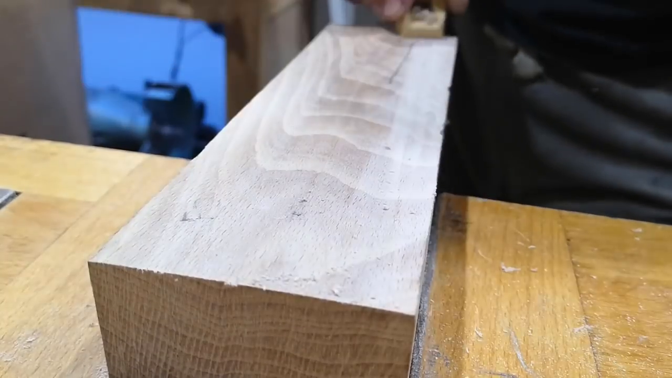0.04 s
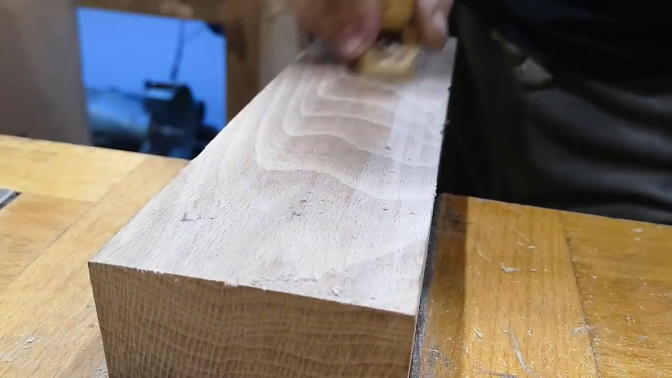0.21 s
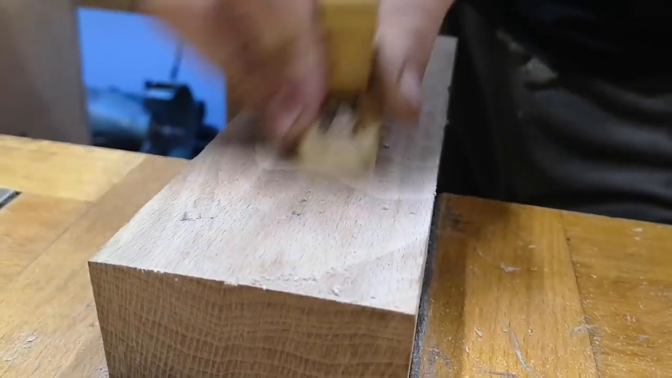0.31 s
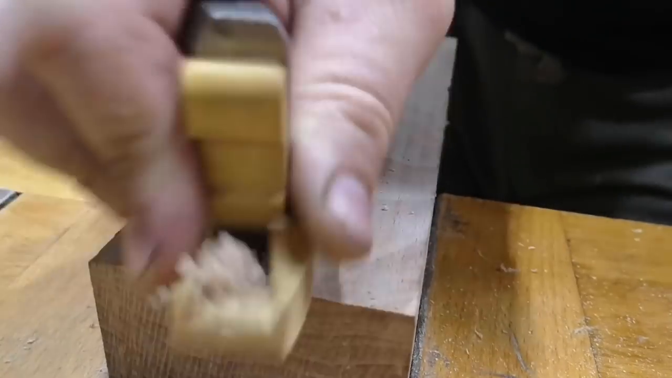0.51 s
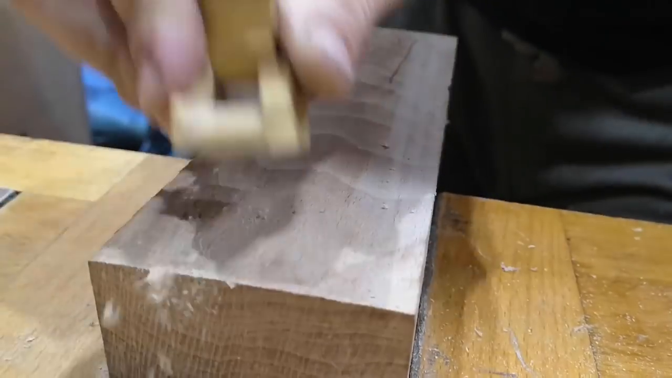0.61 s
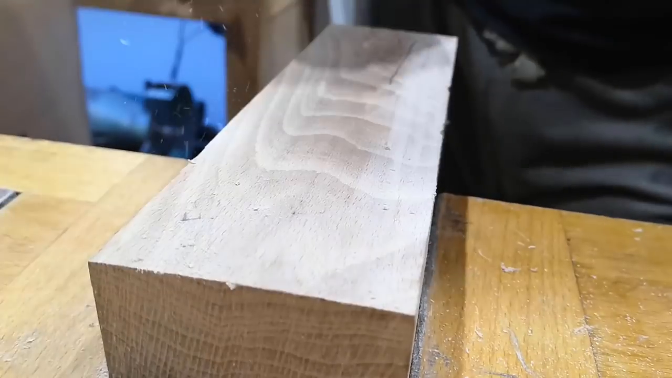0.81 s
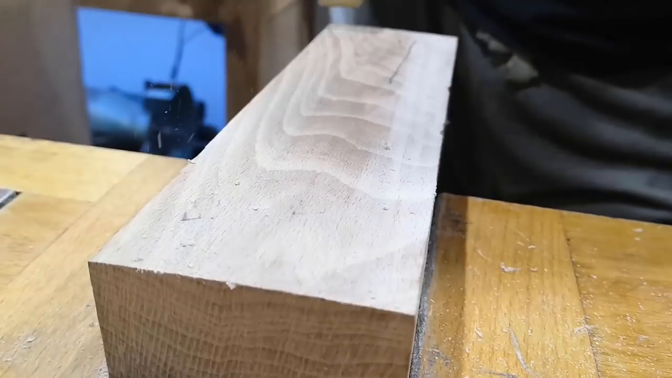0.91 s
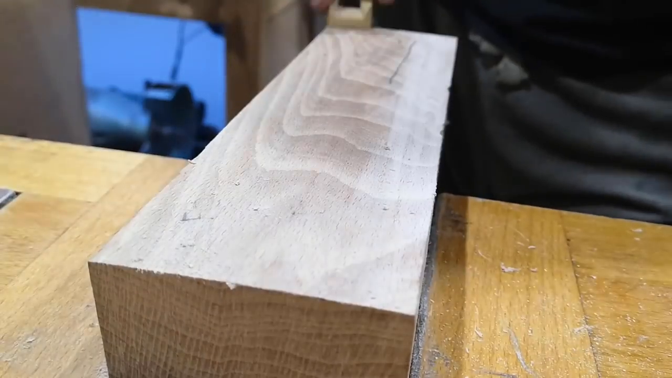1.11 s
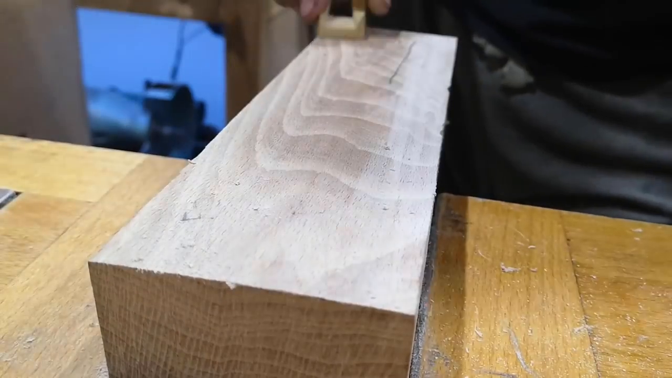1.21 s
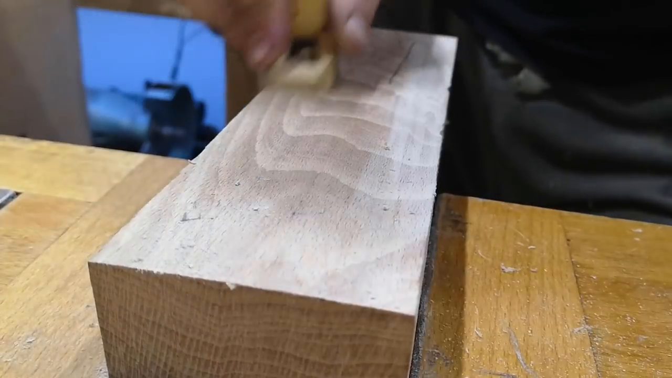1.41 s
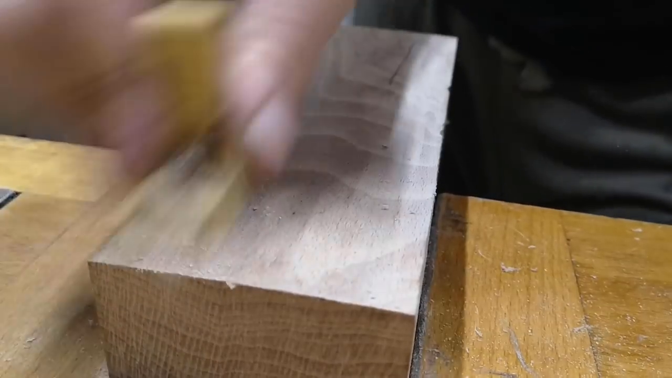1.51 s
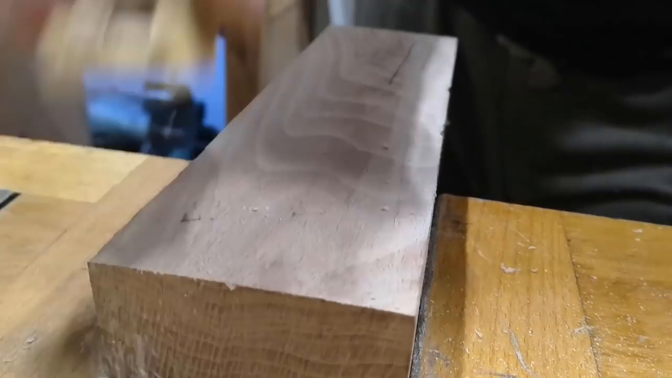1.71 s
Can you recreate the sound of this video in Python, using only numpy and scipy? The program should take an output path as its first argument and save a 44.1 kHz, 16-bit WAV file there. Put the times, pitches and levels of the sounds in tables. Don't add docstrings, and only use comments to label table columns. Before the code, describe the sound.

Hand plane strokes on hardwood: a squealing, chattering scrape, a few wooden knocks, then one crisp rising rasp

```python
import sys
import numpy as np
from scipy import signal
from scipy.fft import rfft, irfft, next_fast_len
from scipy.io import wavfile
from scipy.ndimage import uniform_filter1d

SR = 44100
rng = np.random.default_rng(int(sys.argv[2]) if len(sys.argv) > 2 else 0)


def makeup_ratio(level_db):
    decades = np.asarray(level_db, float) / 20
    return 10 ** decades


def int16_out(signal):
    q = np.round(np.clip(np.atleast_2d(signal).T, -1, 1) * 32767)
    wavfile.write(sys.argv[1], SR, q.astype(np.int16))


N = 79380
T = np.arange(N) / SR
SIZE = next_fast_len(N + SR // 2)
HZ = np.arange(SIZE // 2 + 1) * SR / SIZE + 1e-3


def unit(x):
    return x / np.sqrt(np.mean(x ** 2))


def along(table):
    hz, value = np.array(table, float).T
    return np.interp(np.log(HZ), np.log(hz), value)


def ring(x, peaks, order=1):
    response = 0
    for k, (hz, width_hz, level_db) in enumerate(peaks):
        detune = (HZ / hz - hz / HZ) * hz / width_hz
        response = response + (-1) ** k * makeup_ratio(level_db) / (1 + 1j * detune) ** order
    return irfft(rfft(x, SIZE) * response, SIZE)[:N]


def walk(rate_per_s):
    hold = int(SR / rate_per_s)
    steps = np.repeat(rng.standard_normal(N // hold + 1), hold)
    return unit(uniform_filter1d(uniform_filter1d(steps, hold), hold)[:N])


def fibres():
    snaps_per_s, spread_db = 16000, 1.8
    grain_db, grain_per_s = 1.2, 300
    hit = rng.random(N) < snaps_per_s / SR
    snaps = hit * makeup_ratio(spread_db * rng.exponential(size=N)) * rng.standard_normal(N)
    return snaps * makeup_ratio(grain_db * walk(grain_per_s))


# start_s, cut_db, rub_db
STROKES = [
    [(0, -34, -33), (.012, -34.5, -37.5), (.035, -43.5, -38.5), (.064, -54, -48), (.118, -94, -93.5),
     (.16, -66.5, -54.5)],
    [(.165, -59, -55.5), (.181, -30, -40.5), (.237, -24, -35), (.335, -23.5, -37.5), (.375, -19, -34),
     (.382, -28, -37.5), (.393, -33, -43), (.485, -58.5, -53), (.497, -85.5, -85)],
    [(.5015, -69, -43), (.516, -72, -51.5), (.56, -49, -62.5), (.59, -76, -47), (.64, -94, -64.5),
     (.7, -87, -70.5)],
    [(1.17, -51, -42), (1.212, -66.5, -52.5), (1.248, -64, -65.5), (1.255, -44, -48.5), (1.275, -36, -42),
     (1.336, -33.5, -41), (1.4, -27.5, -38.5)],
    [(1.4, -26, -38), (1.518, -17.5, -38.5), (1.537, -21.5, -41), (1.542, -32, -46.5), (1.59, -47.5, -51),
     (1.625, -45, -62), (1.645, -78, -76.5), (1.72, -99, -97)],
]
# pitch_hz, width_hz, level_db, edge_db (blade edge ring)
SPOTS = [(1050, 170, 12, -4.5), (1586, 80, 9, -3), (1253, 296, -10, -17), (1400, 65, -12, -1.5),
         (1400, 92, -8, 5)]
# pitch_hz, width_hz, level_db
BLADE = [(3678, 830, -18.5), (5557, 1710, -10.5), (6830, 1200, -4.5), (7690, 1100, -10.5),
         (8800, 1700, -18), (10970, 1300, -30), (13370, 4500, -30)]
# pitch_hz, width_hz, level_db
SOLE = [(180, 170, -7), (438, 308, -4.5), (864, 1380, -5), (1120, 250, -2), (1340, 467, 3), (1909, 98, 5),
        (2122, 365, 3), (2764, 270, -13)]
# centre_s, boost_db, length_s
SNAGS = [(.268, 3.5, 0.0022), (.29, 2, .003), (.365, 2, .002), (0.373, 1.5, .003), (0.381, 2.5, .002),
         (1.448, -0.5, 0.0038), (1.461, -0.5, 0.0025), (1.478, -1, 0.0037), (1.489, 6.5, .002),
         (1.503, 3, 0.0051), (1.514, 2.5, .0015), (1.516, 0.5, 0.00077), (1.523, 1.5, 0.0014),
         (1.525, -3, .001), (1.528, 7.5, 0.0019), (1.535, 2.5, 0.0012), (1.538, 4.5, .001)]
# centre_s, level_db, length_s, pitch_hz, width_hz
PUFFS = [(.008, -31.5, 0.01, 1486, 161), (0.253, -36, 0.026, 2707, 200), (0.327, -33.5, 0.029, 2640, 130),
         (0.355, -36.5, .005, 2130, 300), (0.382, -35, 0.0064, 2188, 200), (0.396, -40, 0.004, 2258, 200),
         (0.431, -52.5, 0.037, 10580, 8800), (0.446, -50, 0.031, 4520, 820),
         (.5025, -42, .0012, 4500, 6000), (.568, -35.5, 0.0041, 4500, 3000),
         (.5835, -40.5, .0012, 4440, 6000), (1.565, -44.5, .02, 1750, 250),
         (0.549, -58.5, 0.031, 8800, 9500), (1.584, -52.5, 0.047, 11270, 8590),
         (1.616, -45, 0.017, 4160, 677), (1.62, -47, 0.028, 1410, 378), (1.626, -43.5, 0.03, 482, 420)]


def scrape():
    edge_hz, edge_width_hz = 6618, 370
    torn, sole, out = fibres(), fibres(), 0
    bite = makeup_ratio(sum(db * np.exp(-((T - s) / d) ** 2) for s, db, d in SNAGS))
    for rows, (hz, width_hz, level_db, edge_db) in zip(STROKES, SPOTS):
        start_s, cut_db, rub_db = np.array(rows).T
        on = (T >= start_s[0]) & (T < start_s[-1])
        edge = ring(torn, [(edge_hz, edge_width_hz, edge_db)], order=2)
        blade = unit(ring(torn, BLADE, order=2) + edge)
        rub = makeup_ratio(4) * unit(ring(sole, SOLE + [(hz, width_hz, level_db)], order=2))
        cut = makeup_ratio(np.interp(T, start_s, cut_db)) * bite * blade
        out = out + on * (cut + makeup_ratio(np.interp(T, start_s, rub_db)) * rub)
    for centre_s, level_db, length_s, hz, width_hz in PUFFS:
        swell = makeup_ratio(level_db) * np.exp(-((T - centre_s) / length_s) ** 2)
        out = out + swell * unit(ring(sole, [(hz, width_hz, 0)], order=2))
    return out


# centre_s, peak_db, length_s, pitch_hz
CHATTER = [(0.189, -45, 0.0032, 1400), (.2, -22.5, 0.013, 1325), (0.216, -21, 0.0082, 1309),
           (0.229, -18, 0.0077, 1369), (0.25, -13, .011, 1375), (0.267, -19, 0.0071, 1319),
           (.281, -13, 0.0068, 1409), (0.297, -21, 0.0082, 1400), (.306, -10.5, 0.0052, 1346),
           (0.312, -17, 0.0037, 1332), (0.3226, -4.5, 0.0061, 1338), (0.34, -16, 0.0084, 1375),
           (0.368, -34.5, 0.0059, 1330)]
FLIPS = [.238, .258, .292, .333, .353]


def chatter():
    flip_s, wobble, overtone_db = 0.0012, 0.01, -19.5
    centre_s, _, _, pitch_hz = np.array(CHATTER).T
    swell = sum(makeup_ratio(db) * np.exp(-((T - s) / (0.84 * d)) ** 2) for s, db, d, _ in CHATTER)
    hz = np.interp(T, centre_s, pitch_hz) * (1 + wobble * walk(300))
    phase = 2 * np.pi * np.cumsum(hz) / SR
    turn = np.prod([np.tanh((T - s) / flip_s) for s in FLIPS], axis=0)
    return swell * (turn * np.sin(phase) + makeup_ratio(overtone_db) * np.sin(2 * phase))


# start_s, level_db, contact_ms, iron_db, crack_db
KNOCKS = [(0.4739, -31.5, 0.88, -25, -34), (0.4806, -45.5, 0.25, -20, -6),
          (0.502, -20, 0.067, -23.5, -14.5), (0.5064, -26.5, 0.25, -31, -32), (.565, -23, 0.29, -18, 1),
          (0.5688, -25, 0.15, -19.5, -8), (0.5827, -17.5, 0.48, -19.5, -8.5),
          (.594, -25.5, 0.6, -27, -28.5), (1.150, -19.5, 0.11, -13.5, -5.5),
          (1.154, -22.5, 0.066, -13, -15.5), (1.165, -30, 0.34, -4, -22.5), (1.196, -30, 0.9, -8.5, -16.5)]
# pitch_hz, level_db, t60_s
BOARD = [(100.9, -23, 0.04), (180, -17, 0.2), (277, -16, 0.15), (373.3, -12, 0.15), (460, -5.5, 0.039),
         (535.4, -4, 0.067), (718, -2.5, 0.039), (926, 1, 0.023), (1174, 1, 0.032), (1332, 1.5, 0.013),
         (1453, 1.5, 0.029), (1680, -7.5, 0.035), (1986, -3, 0.036), (2306, -13, 0.056)]
# pitch_hz, level_db, t60_s
IRON = [(3871, 2.5, 0.026), (5960, -10, 0.043), (7640, 2.5, 0.0068)]


def knocks():
    mode_spread, scatter_db = .025, 2.2
    held_t60_s, iron_t60_s = .13, .05
    crack_s, crack_hz = .0006, 6000
    out, t = np.zeros(N + SR), np.arange(SR // 4) / SR
    for start_s, level_db, contact_ms, iron_db, crack_db in KNOCKS:
        iron = [(hz, db + iron_db + 10, min(t60_s, iron_t60_s)) for hz, db, t60_s in IRON]
        modes = np.repeat(BOARD + iron, repeats=4, axis=0)
        luck = rng.standard_normal((3, len(modes)))
        hz = modes[:, 0] * (1 + mode_spread * luck[0])
        softness = 1 + (hz * contact_ms / 1000) ** 2
        gain = makeup_ratio(modes[:, 1] + scatter_db * luck[1]) / softness * np.sign(luck[2])
        decay = np.exp(-np.log(1000) * t / np.minimum(modes[:, 2:], held_t60_s))
        body = gain @ (np.sin(2 * np.pi * hz[:, None] * t) * decay)
        crack = makeup_ratio(crack_db + 11) * rng.standard_normal(len(t)) * np.exp(-t / crack_s)
        crack = signal.lfilter(*signal.butter(1, crack_hz, fs=SR), crack)
        first = int(start_s * SR)
        out[first:first + len(t)] += makeup_ratio(level_db - 12) * (body + crack)
    return out[:N]


# start_s, level_db, pitch_hz, t60_s
NOTES = [(.473, -32.5, 259.5, .05), (.480, -34.5, 575, 0.056), (.502, -29.5, 560, 0.036),
         (.503, -32.5, 830, 0.033), (.508, -29, 62.5, 0.11), (.561, -22, 190, .05), (.565, -25, 264.4, .09),
         (.566, -28, 825, 0.075), (.569, -35.5, 523, .08), (.582, -30.5, 373.5, 0.19),
         (.583, -36, 570, .07), (.583, -32.5, 269.5, 0.11), (.583, -26, 1213, 0.056),
         (.594, -33.5, 423, 0.15), (.602, -38, 520, 0.14), (1.156, -33, 374, 0.28),
         (1.150, -33, 494, 0.063), (1.151, -21.5, 932, 0.032), (1.152, -22, 1504, .03),
         (1.152, -22.5, 1170, 0.038), (1.155, -32.5, 205, 0.041), (1.163, -29, 425.7, 0.13),
         (1.164, -30, 282, 0.042), (1.165, -36.5, 733, 0.13), (1.180, -39.5, 521, 0.18),
         (1.207, -36.5, 429, 0.11)]


def notes():
    rise_s, choke_s = 0.0018, .095
    shake_db, shake_per_s = 2.2, 120
    out = 0
    for start_s, level_db, hz, t60_s in NOTES:
        t = np.maximum(T - start_s, 0)
        fade = np.exp(-np.log(1000) * t / t60_s - (t / choke_s) ** 3) * (1 - np.exp(-t / rise_s))
        level = makeup_ratio(level_db + shake_db * walk(shake_per_s))
        out = out + level * np.sin(2 * np.pi * hz * t) * fade
    return out


# start_s, level_db, upper_db (thud over sway)
BENCH = [(0.0, -43, -14), (0.03, -59.5, 4.5), (0.16, -53.5, -11.5), (0.21, -54, -25.5), (0.3, -48.5, -25),
         (0.34, -43.5, 11), (0.54, -37, -10), (0.571, -36, -2), (0.646, -47, -12), (0.752, -66.5, -17),
         (1.092, -74, -12), (1.162, -60.5, -10.5), (1.242, -51, -8.5), (1.508, -56, 9), (1.538, -34.5, -1),
         (1.658, -41.5, -37), (1.687, -57, 12.5), (1.8, -71, -39.5)]


def bench():
    start_s, level_db, upper_db = np.array(BENCH).T
    sway = unit(ring(rng.standard_normal(N), [(27.5, 12, 0)], order=1))
    thud = unit(ring(rng.standard_normal(N), [(97, 50, -2), (169.0, 65, -7.5)], order=2))
    return makeup_ratio(np.interp(T, start_s, level_db)) * (sway + makeup_ratio(np.interp(T, start_s, upper_db)) * thud)


# pitch_hz, level_db
PORT_DB = [(200, 0.5), (700, 1), (1300, 1), (2400, -1), (4400, 4.5), (8000, 4.5), (11000, -4), (15000, 0.5)]
# pitch_hz, phase_rad
PORT_RAD = [(150, 1), (690, -3), (1350, 0.87), (1950, 0.03), (2300, 2.5), (4700, 5.5), (6500, 3.5),
            (10400, 3.5)]
# pitch_hz, likeness_0_to_1
PORT_LIKE = [(60, 1), (250, 0.86), (600, 0.68), (1350, 0.65), (2500, 0.1), (6500, 0.64), (9000, 0.24),
             (15000, 0.18)]


def ports(x, other):
    like = np.clip(along(PORT_LIKE), 0, 1)
    turn = makeup_ratio(along(PORT_DB) / 2) * np.exp(.5j * along(PORT_RAD))
    shared = rfft(x, SIZE) * np.sqrt((1 + like) / 2)
    unlike = rfft(other, SIZE) * np.sqrt((1 - like) / 2)
    return irfft(np.array([(shared + unlike) * turn, (shared - unlike) / turn]), SIZE)[:, :N]


def room(x):
    t60_s, low_hz, top_hz = 0.17, 200, 5050
    t = np.arange(SR // 2) / SR
    band = signal.butter(1, [low_hz, top_hz], "band", fs=SR)
    tail = signal.lfilter(*band, rng.standard_normal((2, len(t))))
    tail = tail * np.exp(-np.log(1000) * t / t60_s) * (t > .004)
    return signal.fftconvolve(x[None], tail / np.sqrt(np.sum(tail ** 2) / 2), axes=1)[:, :N]


# pitch_hz, level_db_per_hz
SHOP = [(12, -43.5), (20, 4), (87, -25), (129, -11.5), (148, -33.5), (252, -26), (565, -45), (1720, -33),
        (15500, -50.5)]


def shop():
    level_db = -63
    hiss = [irfft(rfft(rng.standard_normal(SIZE)) * makeup_ratio(along(SHOP)), SIZE)[:N] for _ in range(2)]
    return makeup_ratio(level_db) * ports(*hiss) / np.sqrt(np.mean(hiss[0] ** 2))


def scene():
    rub, song, hits = scrape(), chatter(), knocks()
    smear = rng.standard_normal(256) * np.exp(-np.arange(256) / 30) / 4
    scatter = signal.fftconvolve(hits, smear)[:N]
    wet = room(makeup_ratio(-16) * rub + makeup_ratio(-23.5) * song + makeup_ratio(-11) * hits)
    return ports(rub + song + hits, scrape() + scatter) + wet + bench() + shop() + notes()


def roll_off(x):
    return signal.sosfilt(signal.butter(12, 15750, fs=SR, output="sos"), x)


def record(dry):
    top_hz = 15100
    mix = signal.sosfilt(signal.ellip(5, .5, 28, top_hz, fs=SR, output="sos"), dry)
    return roll_off(mix)


dry = scene()
out = record(dry)
int16_out(out)
```